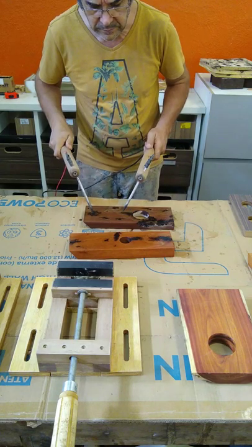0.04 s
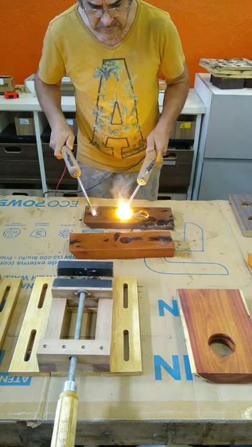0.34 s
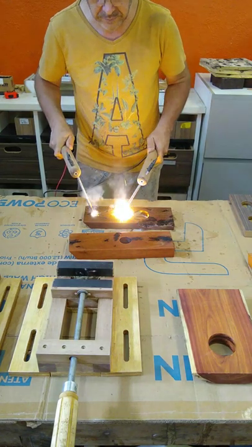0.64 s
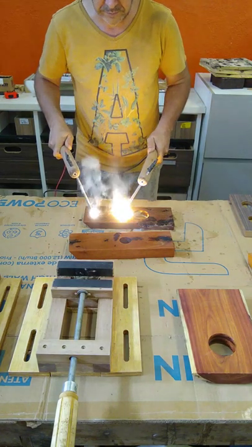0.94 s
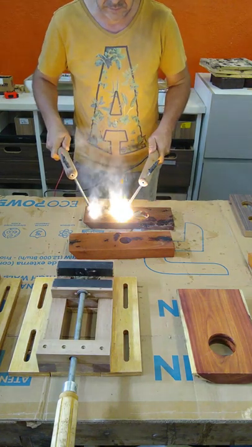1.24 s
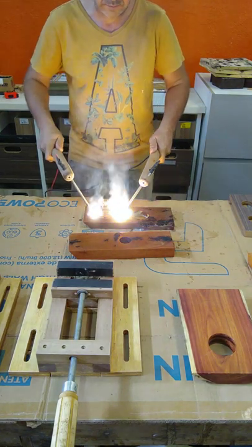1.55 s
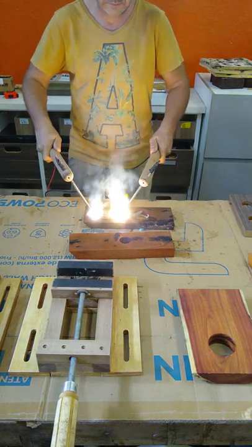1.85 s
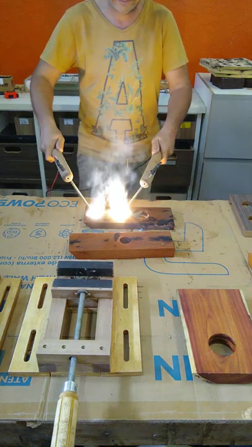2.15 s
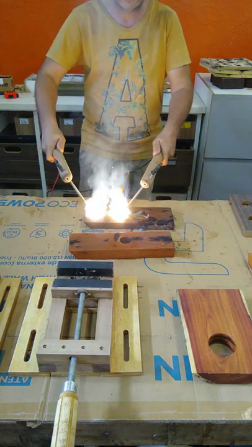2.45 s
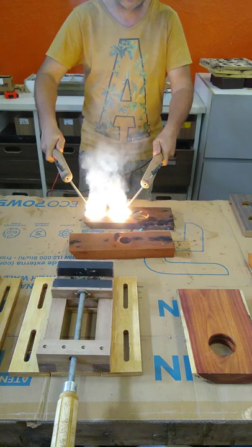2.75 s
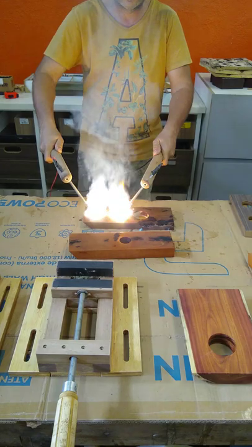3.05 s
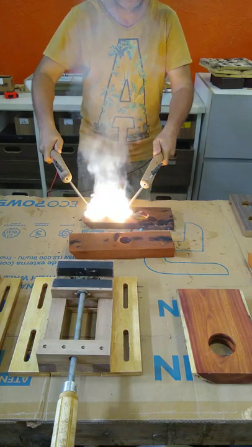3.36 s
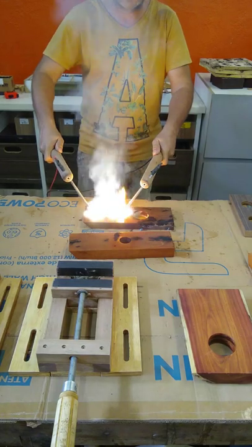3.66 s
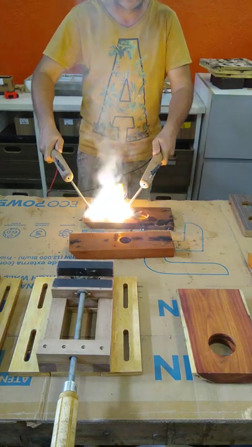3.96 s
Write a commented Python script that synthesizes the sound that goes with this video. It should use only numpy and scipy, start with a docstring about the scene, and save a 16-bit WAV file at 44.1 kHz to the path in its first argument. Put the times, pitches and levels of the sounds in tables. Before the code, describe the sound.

Electric arcs buzz and crackle as they burn wood, over a steady low hum.

```python
"""Two high-voltage probes burn a track into damp wood, close to a stereo pair at a workshop bench.
A thin squeal (probably steam) comes first. At a quarter second the arc strikes with a snap: each
half-cycle of the mains fires a burst of tiny sparks and pumps the hot air into a hum, the two
polarities sparking unequally. The char crackles and pops over a rumble of hot gas, and the squeal
fades as the wood dries. At about 3.3 s the two burns join in one rushing flame."""
import sys
import numpy as np
from scipy import signal
from scipy.fft import rfft, irfft
from scipy.io import wavfile

SR = 44100
rng = np.random.default_rng(int(sys.argv[2]) if len(sys.argv) > 2 else 0)


def persist_wave(psi):
    """Save psi, clipped to +-1, as 16-bit WAV."""
    counts = np.round(np.clip(psi, -1, 1) * 32767).astype(np.int16)
    wavfile.write(sys.argv[1], SR, np.atleast_2d(counts).T)


N = 176400
TIME = np.arange(N) / SR
FREQ_HZ = np.arange(N + 1) * SR / (2 * N)
MAINS_HZ, IGNITION_S = 60, 0.243
ROOM_T60_S, ROOM_DB = 0.31, -7.5


def from_db(db):
    """Decibels to gain."""
    return 10 ** (np.asarray(db) / 20)

def unit_rms(x):
    """Scale to unit power."""
    return x / np.sqrt(np.mean(x ** 2) + 1e-20)

def in_time(rows):
    """A time table's value at every sample."""
    return np.interp(TIME, *np.transpose(rows))

def at_hz(rows):
    """A spectrum table's value at every frequency of FREQ_HZ."""
    hz, value = np.transpose(rows)
    return np.interp(np.log(FREQ_HZ + 1), np.log(hz), value)

def shape(x, gain_db):
    """Causal, minimum-phase filter with the given gains."""
    cepstrum = irfft(np.log(from_db(gain_db)))
    response = np.exp(rfft(2 * cepstrum[:N], 2 * N) - cepstrum[0])
    return irfft(rfft(x, 2 * N) * response)[..., :N]

def drift(rate_hz):
    """Smooth random wander of spread 1."""
    step = 20
    pole = np.exp(-2 * np.pi * rate_hz * step / SR)
    noise = rng.standard_normal(N // step + 2002)
    slow = signal.lfilter([1], [1, -2 * pole, pole * pole], noise)[2000:]
    return np.interp(np.arange(N) / step, np.arange(len(slow)), unit_rms(slow))

def burning(rise_s=0.025):
    """0 before the arc strikes, then up to 1."""
    return np.clip((TIME - IGNITION_S) / rise_s, 0, 1)

def clicks(per_s, spread_db, scatter_db):
    """Tiny discharges of uneven size: one stream in both microphones, plus a scatter in each."""
    sizes = from_db(spread_db * np.clip(rng.standard_normal((3, N)), -2, 2))
    signs = rng.choice([-1, 1], (3, N))
    streams = sizes * signs * (rng.random((3, N)) < per_s / SR)
    return unit_rms(streams[0] + from_db(scatter_db) * streams[1:])

def workshop(x, room_db):
    """Direct sound from the bench and a dying cloud of echoes, different at each microphone."""
    age = TIME[:SR // 2]
    tail = rng.standard_normal((2, len(age))) * from_db(-60 * age / ROOM_T60_S) * (age > .003)
    tail = tail / np.sqrt(np.sum(tail ** 2, axis=1, keepdims=True))
    echoes = signal.fftconvolve(np.atleast_2d(x), tail, axes=1)[:, :N]
    return (x + from_db(room_db) * echoes) / np.sqrt(1 + from_db(room_db) ** 2)

def blurred_echoes(x, room_db):
    """The arc never stands still, so the echoes of its sparks blur into a dying hiss."""
    decay = from_db(-120 / (ROOM_T60_S * SR))
    power = signal.lfilter([1 - decay], [1, -decay], x ** 2 + 1e-18)
    hiss = np.sqrt(power) * rng.standard_normal((2, N))
    return (x + from_db(room_db) * hiss) / np.sqrt(1 + from_db(room_db) ** 2)

# How alike diffuse sound is at the two microphones: freq_hz, correlation
MIC_LIKENESS = [(60, 0.95), (250, 0.94), (600, 0.63), (1200, 0), (16000, 0.73)]
def diffuse(colour):
    """Noise from all round the pair: alike in the bass, unrelated near 1.2 kHz, partly alike above."""
    alike = np.clip(at_hz(MIC_LIKENESS), 0, 1)
    mid, side = rfft(rng.standard_normal((2, 2 * N))) * from_db(at_hz(colour))
    left_right = np.sqrt(1 + alike) * mid + np.sqrt(1 - alike) * side * [[1], [-1]]
    return unit_rms(irfft(left_right)[:, :N])

# Spectrum of the workshop behind the bench: freq_hz, level_db
ROOM_TONE_COLOUR = [(40, -17), (105, 3), (200, -6), (450, -9), (1400, -13), (2000, -16), (4500, -24),
                    (7800, -23), (11000, -36), (16000, -41)]
def room_tone(level_db=-52.5):
    """The workshop's steady, low background noise."""
    return from_db(level_db) * diffuse(ROOM_TONE_COLOUR)

# Rumble above the burn: time_s, level_db
GAS_LEVEL = [(.25, -77), (.6, -54.5), (1.35, -50), (1.72, -52), (2.2, -55), (2.9, -60), (3.6, -55)]
# Its spectrum: freq_hz, level_db
GAS_COLOUR = [(38, -26), (55, 3), (72, 1), (150, -4), (220, -4.5), (400, -13), (2000, -45)]
def gas_rumble():
    """Hot gas rumbles as it rises off the wood."""
    return from_db(in_time(GAS_LEVEL)) * burning() * diffuse(GAS_COLOUR)

# Spectrum of the hiss as the flame catches: freq_hz, level_db
CATCH_COLOUR = [(400, -21), (2300, 7), (8000, 5), (16000, -16)]
# Rush of the flame: time_s, level_db
RUSH_LEVEL = [(3.24, -85), (3.3, -49.5), (4.0, -50.5)]
# Its spectrum: freq_hz, level_db
RUSH_COLOUR = [(100, -28), (500, -2), (1150, 3), (1650, -4), (3700, -8.5), (9000, -16), (16000, -36)]
def flame(catch_s=3.315, catch_width_s=0.066, catch_db=-45):
    """The two burns join in one flame, which catches with a short hiss and then rushes."""
    swell = np.exp(-((TIME - catch_s) / catch_width_s) ** 2)
    hiss = from_db(catch_db) * swell * diffuse(CATCH_COLOUR)
    return hiss + from_db(in_time(RUSH_LEVEL)) * diffuse(RUSH_COLOUR)

# Squeal from the damp wood: time_s, level_db
SQUEAL_LEVEL = [(0, -64.5), (.146, -57.5), (.17, -66), (.195, -55), (.295, -53.5), (.32, -54), (.378, -62),
                (.415, -45), (.49, -63), (.526, -63), (.654, -56.5), (.704, -72.5), (.8, -55.5), (.82, -71),
                (2.0, -70.5), (2.3, -79)]
# Its fundamental: time_s, pitch_hz
SQUEAL_FUNDAMENTAL = [(0, 3180), (.42, 3135)]
# Its harmonics: multiple, gain_db
SQUEAL_HARMONICS = [(1, 7.5), (2, -5.5), (3, -14), (4, -29)]
# Lift of those above the second, greatest just before the arc strikes: time_s, gain_db
SQUEAL_LIFT = [(.17, 4), (.195, 11), (.42, 6)]
def squeal(jitter_hz=28, flutter_db=2.4):
    """A thin, fluttering whistle, probably steam, that fades as the wood dries."""
    pitch_hz = in_time(SQUEAL_FUNDAMENTAL) + jitter_hz * drift(rate_hz=163)
    phase = 2 * np.pi * np.cumsum(pitch_hz) / SR
    tone = 0
    for multiple, gain_db in SQUEAL_HARMONICS:
        level_db = gain_db + in_time(SQUEAL_LIFT) * (multiple > 2) + flutter_db * drift(rate_hz=82)
        tone += from_db(level_db) * np.sin(multiple * phase)
    return tone * from_db(in_time(SQUEAL_LEVEL))

# Hum of the arc: time_s, level_db
HUM_LEVEL = [(.245, -56), (.29, -46.5), (.68, -41), (.85, -43.5), (1.05, -43), (1.4, -45), (2.02, -43),
             (2.09, -45), (2.16, -41.5), (2.23, -45), (2.6, -43), (4.0, -43)]
# Its harmonics: mains_multiple, gain_db
HUM_HARMONICS = [(2, 1), (3, -25), (4, -4.5), (6, -9.5), (8, -25), (12, -29.5)]
# Lift of the buzzing top of the hum: time_s, gain_db
BUZZ_LIFT = [(2.15, 6), (2.4, 10), (3.3, 5.5)]
def arc_hum(buzz_above_hz=650, waver_db=1.0, smear_s_per_hz=2.8e-5):
    """The arc heats the air twice a mains cycle; each harmonic wavers on its own."""
    tone = 0
    for multiple, gain_db in HUM_HARMONICS:
        hz = multiple * MAINS_HZ
        level_db = gain_db + in_time(BUZZ_LIFT) * (hz > buzz_above_hz) + waver_db * drift(rate_hz=3.5)
        delay_s = smear_s_per_hz * hz / 2  # the room makes higher harmonics arrive later
        tone += from_db(level_db) * np.cos(2 * np.pi * hz * (TIME - delay_s))
    return np.sqrt(2) * tone * from_db(in_time(HUM_LEVEL)) * burning()

# Crackle along the burnt track: time_s, level_db
CRACKLE_LEVEL = [(.25, -44), (.45, -42.5), (1.3, -48.5), (1.9, -50.5), (2.15, -53), (2.45, -52.5),
                 (3.2, -65.5), (4.0, -52)]
# Its spectrum: freq_hz, level_db
CRACKLE_COLOUR = [(100, 8), (300, -4), (700, 2.5), (1100, -6), (1900, -3.5), (2800, -4), (3600, -8.5),
                  (6000, -6), (16000, -62)]
def char_crackle(firing):
    """Charring wood gives a dull crackle, loudest during the bursts of sparks."""
    drive = (unit_rms(firing) + 1) * burning()
    ticks = clicks(per_s=2200, spread_db=4.5, scatter_db=-5) * drive
    return from_db(in_time(CRACKLE_LEVEL)) * unit_rms(shape(ticks, at_hz(CRACKLE_COLOUR)))

def cracks(events, colour, tail_db=-17.5, tail_s=0.0017):
    """Single impulses, each with a short spitting tail."""
    hits, age = np.zeros(N), TIME[:SR // 100]
    for start_s, level_db in events:
        start = int(start_s * SR)
        spit = from_db(tail_db) * rng.standard_normal(len(age)) * np.exp(-age / tail_s)
        hits[start:start + len(age)] += from_db(level_db) * np.where(age == 0, 1, spit)
    return shape(hits, at_hz(colour))

# Pops in the wood: start_s, level_db
WOOD_POPS = [(.2563, -12), (1.673, -23), (1.7235, -18.5), (1.8228, -25)]
# Their tone: freq_hz, gain_db
POP_TONE = [(200, -8.5), (700, 10.5), (2200, -0.5), (4000, -5), (16000, -30)]
def wood_pops():
    """The wood bursts with a few dull pops."""
    return cracks(WOOD_POPS, POP_TONE)

# Snaps at the arc: start_s, level_db
ARC_SNAPS = [(.2566, -22.5), (.3227, -12.5), (.3567, -22), (.3726, -21), (.3895, -19), (.4728, -20),
             (.5398, -22.5), (.5890, -25), (1.0230, -22), (1.1564, -21), (1.1893, -23), (1.2228, -19.5),
             (1.4226, -20.5), (1.4731, -20), (1.6060, -20), (1.8228, -28), (2.4806, -22.5), (2.5305, -17),
             (2.8638, -22), (3.5144, -25)]
# Their tone: freq_hz, gain_db
SNAP_TONE = [(200, -5), (700, -2), (2000, 2.5), (3600, -14.5), (6000, 5.5), (9500, 13), (16000, -6)]
def arc_snaps():
    """Loud, bright snaps stand out of the sizzle."""
    return cracks(ARC_SNAPS, SNAP_TONE)

def bursts(cycles, width_ms=0.71, jitter_ms=0.3, spread_db=1.15, between_db=-20):
    """One bell-shaped burst at each whole cycle, with its own strength and timing."""
    nearest = np.round(cycles).astype(int)
    strength, lateness = rng.standard_normal((N // 100, 2))[nearest + 1].T
    offset_ms = (cycles - nearest) * 1000 / MAINS_HZ - jitter_ms * lateness
    bell = np.exp(-(offset_ms / (2 * width_ms)) ** 2)
    return unit_rms((bell + from_db(between_db)) * from_db(spread_db * strength))

# Moment in the mains cycle when the first polarity sparks hardest: time_s, delay_ms
BURST_DELAY = [(.25, 6.55), (4.0, 5.7)]
# Sparking on the first polarity: time_s, level_db
FIRST_POLARITY_LEVEL = [(.25, -45.5), (.68, -44.5), (1.2, -42.5), (1.65, -43), (1.92, -39), (2.25, -45.5),
                        (2.6, -44.5), (3.65, -44), (3.88, -41.5), (4.0, -42.5)]
# Sparking on the opposite polarity: time_s, level_db
SECOND_POLARITY_LEVEL = [(.25, -50.5), (.6, -48.5), (1.5, -50.5), (2.25, -47), (2.42, -43), (2.52, -37.5),
                         (2.82, -37.5), (3.3, -40.5), (3.75, -39), (4.0, -45)]
def arc_firing():
    """Strength of the sparking: the two polarities fire unequally, half a mains cycle apart."""
    cycles = (TIME - in_time(BURST_DELAY) / 1000) * MAINS_HZ
    first = from_db(in_time(FIRST_POLARITY_LEVEL)) * bursts(cycles)
    second = from_db(in_time(SECOND_POLARITY_LEVEL)) * bursts(cycles - .5)
    return burning(rise_s=0.0075) * (first + second)

# Broad spectrum of the sparks, close up: freq_hz, level_db
SIZZLE_COLOUR = [(500, -34), (2000, -17), (3600, -16.5), (5800, -10), (6800, -3.5), (9400, -0.5),
                 (11200, -3.5), (13300, -6), (16000, -6.5)]
# Narrow peaks that colour the sizzle, from its reflection off the bench: freq_hz, gain_db
SIZZLE_RIPPLE = [(6450, 2), (8880, 2), (9480, 3.3), (10520, 2.5), (11100, 3.5), (11850, 3), (12530, 3)]
def sparks(firing, peak_width_hz=190, fresh_band_hz=(3620, 6700), fresh_db=8.5, fresh_fade_s=0.54):
    """Each burst is a cloud of tiny sparks: a bright, buzzing sizzle, fuller while the wood is fresh."""
    cloud = clicks(per_s=14000, spread_db=2.5, scatter_db=-5.5) * firing
    cloud = blurred_echoes(cloud, ROOM_DB)
    peaks_db = sum(db * np.exp(-((FREQ_HZ - hz) / peak_width_hz) ** 2) for hz, db in SIZZLE_RIPPLE)
    sizzle = unit_rms(shape(cloud, at_hz(SIZZLE_COLOUR) + peaks_db)) * np.sqrt(np.mean(firing ** 2))
    body = signal.sosfilt(signal.butter(1, fresh_band_hz, "band", fs=SR, output="sos"), sizzle)
    return sizzle + body * from_db(fresh_db) * np.exp(-(TIME - IGNITION_S) / fresh_fade_s)

def scene():
    """All that is heard at the bench; the same firing drives the sparks and the crackle."""
    firing = arc_firing()
    burn = sparks(firing) + workshop(arc_snaps() + wood_pops(), ROOM_DB)
    burn += workshop(char_crackle(firing), room_db=-3.5)
    hot_air = arc_hum() + gas_rumble() + flame()
    return burn + hot_air + workshop(squeal(), room_db=-9) + room_tone()

# Balance of the stereo pair, which favours the right: freq_hz, left_minus_right_db
MIC_BALANCE = [(100, -1.1), (400, -3), (6300, -2.5), (8400, -0.5), (10000, -5), (11800, -10.5), (13300, -7)]
def record(dry, low_cut_hz=59.4, high_cut_hz=15800):
    """Each microphone has its own colour; the deep bass and the top are cut."""
    mic_gains = from_db(at_hz(MIC_BALANCE) / 2 * [[1], [-1]])
    heard = irfft(rfft(dry, 2 * N) * mic_gains)[:, :N]
    heard = signal.sosfilt(signal.butter(4, low_cut_hz, "high", fs=SR, output="sos"), heard)
    return signal.sosfilt(signal.ellip(12, .1, 80, high_cut_hz, fs=SR, output="sos"), heard)


dry = scene()
out = record(dry)
persist_wave(out)
```